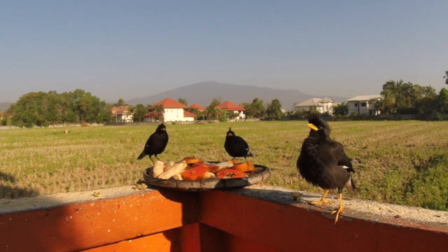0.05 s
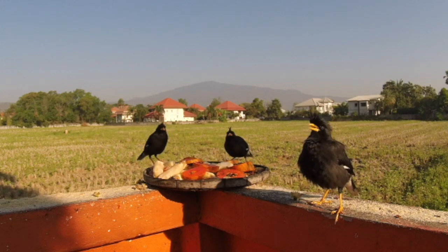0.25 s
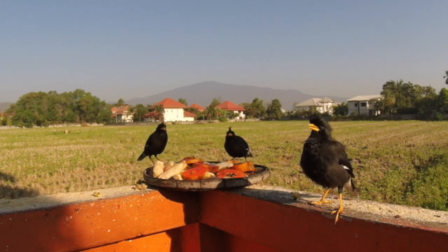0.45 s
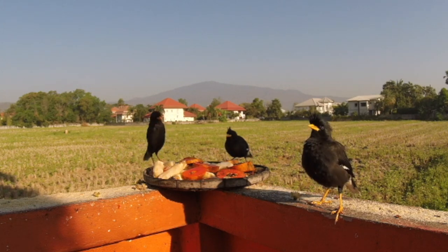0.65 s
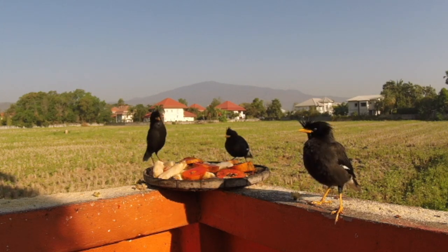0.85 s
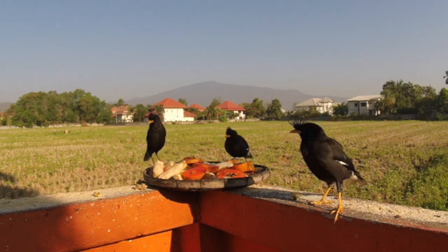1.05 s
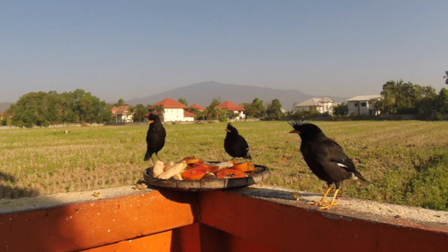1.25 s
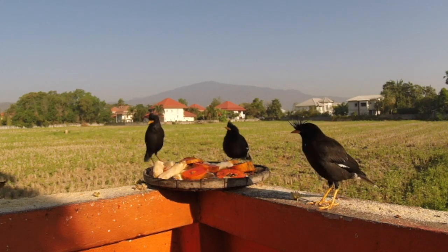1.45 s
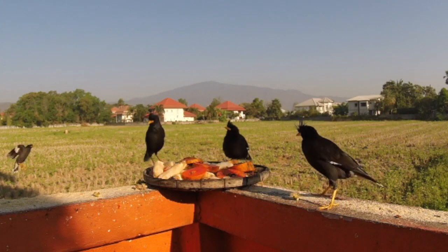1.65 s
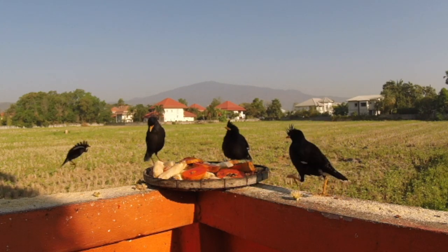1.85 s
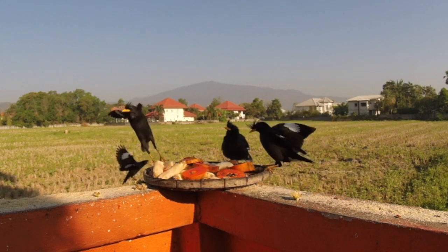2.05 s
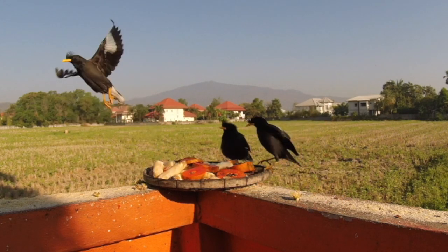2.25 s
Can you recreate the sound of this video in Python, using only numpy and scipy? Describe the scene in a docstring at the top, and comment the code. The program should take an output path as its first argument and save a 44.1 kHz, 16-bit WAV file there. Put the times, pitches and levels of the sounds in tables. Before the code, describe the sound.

A myna close to the microphone gives one loud call, a rising whistle that breaks into fast, harsh swoops. It dies away outdoors, leaving a couple of faint chirps over a soft distant rumble and a thin high whine.

```python
"""A myna gives one loud call: a rising whistle that breaks into seven fast, harsh swoops.
It sings pure up high and rasps down low, coloured by throat and beak peaks and a close reflection.
The balcony throws the call back and it dies away over open fields; other birds add a few faint chirps.
Underneath lie a distant rumble, a faint high buzz and a thin pulsing whine, probably a focus motor."""
import sys
import numpy as np
from scipy import signal
from scipy.fft import rfft, irfft, next_fast_len
from scipy.io import wavfile

SR = 44100
rng = np.random.default_rng(int(sys.argv[2]) if len(sys.argv) > 2 else 0)


def bounce(signal):
    """Save signal as a 16-bit WAV file at the path given by the first command-line argument."""
    frames = np.transpose(np.atleast_2d(signal))
    limited = np.clip(frames, -1, 1)
    pcm = np.round(limited * 32767).astype(np.int16)
    wavfile.write(sys.argv[1], SR, pcm)


N = 101429
T = np.arange(N) / SR

# the myna's opening whistle: t/s, f/Hz, relative level/dB
WHISTLE = [(.204, 2950, -39), (.209, 2874, -11), (.218, 3015, -11.5), (.233, 3015, -6.5),
           (.2375, 3195, -18), (.242, 3319, -3.5), (.254, 3510, -5.5)]
# its swoops: top t/s, top f/Hz, bottom t/s, bottom f/Hz, relative level/dB, rasp trim/dB, octave trim/dB
SWOOPS = [(.261, 4300, .286, 1704, 0.5, -17.5, 1.5), (.298, 4250, .324, 1547, 0.5, -14, -5),
          (.338, 4250, .364, 1550, -.5, -13, -2.5), (.380, 3940, .404, 1564, -.5, -13.5, 0),
          (.419, 3926, .444, 1644, -0.5, -8, -3), (.462, 3987, .487, 1551, 0, -8.5, 0.5),
          (.500, 3437, .524, 1621, -6, -6.5, -1)]


def undb(db):
    """Decibels to gain."""
    return 10 ** (np.asarray(db) / 20)


def unit(x):
    """Scale to rms 1."""
    return x / np.sqrt(np.mean(x ** 2))


def curve(rows):
    """Breakpoint envelope: times in the first column, values in the second."""
    rows = np.array(rows)
    return np.interp(T, rows[:, 0], rows[:, 1])


def wander(hz):
    """Smooth random modulation up to the given rate, rms 1."""
    lowpass = signal.butter(2, hz, fs=SR, output="sos")
    return unit(signal.sosfilt(lowpass, rng.standard_normal(2 * N))[N:])


def colour(x, points):
    """Minimum-phase EQ through (f/Hz, level/dB) points."""
    size = 2 * next_fast_len(N)
    hz, db = np.array(points).T
    f = np.maximum(np.arange(size // 2 + 1) * SR / size, 1)
    cepstrum = irfft(np.log(undb(np.interp(np.log(f), np.log(hz), db))))
    cepstrum[1:size // 2] *= 2
    cepstrum[size // 2 + 1:] = 0
    return irfft(rfft(x, size) * np.exp(rfft(cepstrum)))[:N]


def glide(start, end, midpoint=.48, steep=2.6):
    """S-shaped step from 0 to 1 between two times; the midpoint is a share of the span."""
    u = np.clip((T - start) / (end - start), 0, 1)
    a, b = (u / midpoint) ** steep, ((1 - u) / (1 - midpoint)) ** steep
    return a / (a + b)


def open_air(split_hz=3600, hiss_db=-50):
    """The bed: a distant rumble that swells a little, under a steady soft hiss."""
    # tone of the outdoor air: f/Hz, relative level/dB
    spectrum = [(15, -42), (30, -28), (60, -15), (100, -7), (170, -1), (270, -2), (450, -5.5), (700, -8.5),
                (1300, -12.5), (2900, -17), (4200, -20), (6500, -26), (9000, -31.5), (12000, -38),
                (16000, -41.5)]
    # swell of the rumble: t/s, level/dB
    swell = [(0, -51), (.15, -51.5), (.3, -45.5), (.5, -43), (.65, -45), (.85, -47), (1.15, -49.5),
             (1.7, -48.5), (2.3, -48)]
    noise = unit(colour(rng.standard_normal(N), spectrum))
    rumble = signal.sosfilt(signal.butter(1, split_hz, fs=SR, output="sos"), noise)
    return rumble * undb(curve(swell) + .5 * wander(3.3)) + (noise - rumble) * undb(hiss_db)


def high_buzz(band_hz=(13150, 14450), floor=.2):
    """A narrow, grainy band of very high noise comes and goes."""
    # bursts of buzz: middle t/s, length/s
    bursts = [(.28, .13), (.43, .04), (0.58, .04), (.785, .1), (.89, .03), (1.04, .04), (1.31, .13),
              (1.452, .03), (1.563, .03), (1.85, .13), (2.03, .03), (2.16, .04)]
    envelope = floor + sum(np.cos(np.pi * np.clip((T - s) / length, -.5, .5)) for s, length in bursts)
    noise = signal.sosfilt(signal.butter(3, band_hz, "band", fs=SR, output="sos"), rng.standard_normal(N))
    return undb(-68 + 2.5 * wander(60)) * envelope * unit(noise)


def motor_whine(pitch_hz=7483, sag_hz=128, octave_db=-6.5, backstroke_db=2.5):
    """A tiny motor steps forth and back at an even rate; its pitch sags late in the backstroke."""
    # loudness of the forward stroke: t/s, level/dB
    ride = [(0, -54), (.65, -52.5), (1.15, -54), (1.75, -48), (2.3, -51.5)]
    start_s, period_s, stroke_s, edge_s = .045, .06672, .018, .0031
    age = (T - start_s) % period_s
    forth, back = (np.sin(np.pi / 2 * np.clip(np.minimum(t, stroke_s - t) / edge_s, 0, 1))
                   for t in (age, age - stroke_s))
    sag = np.minimum(age / (2 * stroke_s), 1) ** 2.8 * (1 + .34 * wander(15))
    pitch = (pitch_hz - sag_hz * sag) * (1 + .004 * wander(300))
    phase = 2 * np.pi * np.cumsum(pitch) / SR
    envelope = (forth + undb(backstroke_db) * back) * undb(curve(ride) + 1.7 * wander(70))
    return envelope * (np.sin(phase) + undb(octave_db) * np.sin(2 * phase))


def reflections(x):
    """Each surface scatters the sound back as a delayed, fading cluster."""
    # balcony, house front and fields: delay/s, 60 dB decay time/s, level/dB
    surfaces = [(.004, .075, -14), (.06, .11, -29), (0.016, .9, -41.5)]
    response = np.zeros(N)
    for delay, t60, db in surfaces:
        tail = (T > delay) * np.exp(-np.log(1000) * T / t60)
        response += undb(db) * unit(rng.standard_normal(N) * tail)
    return signal.fftconvolve(x, response / np.sqrt(N))[:N]


def other_birds():
    """Faint chirps, each a short gliding sine with soft edges."""
    # chirps: middle t/s, length/s, f/Hz, glide/Hz, level/dB
    chirps = [(0.032, 0.011, 3210, -19, -48), (0.112, .022, 3200, -100, -56.5),
              (1.595, .0052, 3380, -150, -34.5), (1.975, 0.068, 3880, 300, -53.5)]
    out = np.zeros(N)
    for s, length, hz, glide_hz, db in chirps:
        u = np.clip((T - s) / length, -.5, .5)
        phase = 2 * np.pi * np.cumsum(hz + glide_hz * u) / SR
        out += undb(db) * np.cos(np.pi * u) ** 2 * np.sin(phase)
    return out


def myna_pitch(end_s, end_hz=1822):
    """The whistle climbs, then the pitch leaps and dives through each swoop and ends on a small lift."""
    pitch = curve(WHISTLE)
    last_s, last_hz, _ = WHISTLE[-1]
    for top_s, top_hz, low_s, low_hz, *_ in SWOOPS:
        pitch *= (top_hz / last_hz) ** glide(last_s, top_s)
        pitch *= (low_hz / top_hz) ** glide(top_s, low_s, midpoint=.42, steep=1.9)
        last_s, last_hz = low_s, low_hz
    return pitch * (end_hz / last_hz) ** glide(last_s, end_s)


def myna(end_s=.531, release_s=.003, harsh_below_hz=2770, flutter_hz=566):
    """The syrinx sings pure when high; when low it gains overtones and a half-pitch rasp."""
    # harmonics 3 to 5 of the syrinx: level/dB before the roll-off
    overtones = [-6, -4, -15]
    # rasp partials at 1.5, 2.5 ... 5.5 times the pitch: relative level/dB
    rasp_partials = [-1, 1, -4.5, -1.5, -10.5]
    # colour of the call: throat and beak peaks, with notches from a close reflection: f/Hz, level/dB
    call_colour = [(700, -47), (1250, -23), (1550, -8), (1750, -12), (2050, -15), (2200, -8.5), (2330, -27),
                   (2480, 1), (2750, -3), (3020, -3), (3140, -15), (3300, 1.5), (3500, -0.5), (3930, -7.5),
                   (4150, -31), (4400, -19), (4750, -12), (5150, -26), (5550, -12), (5900, -27), (6350, -9),
                   (7100, -37), (8100, -14), (8600, -29), (9300, -51.5), (11000, -61.5), (16000, -63.5)]
    pitch = myna_pitch(end_s)
    top_s, _, low_s, _, swoop_db, rasp_db, octave_db = np.array(SWOOPS).T
    swooping = np.interp(T, (top_s[0], top_s[0] + .008), (0, 1))
    rough = swooping * np.interp(T, (.29, .39), (.45, 1))
    harsh = swooping * np.clip((harsh_below_hz - pitch) / 800, 0, 1)
    bright = undb(np.interp(T, (.45, .53), (0, -6.5)))  # the top dulls as the call ends
    climb = np.maximum(np.gradient(pitch), 0) * swooping
    breaking = climb / climb.max()  # the tone shakes and dips on each fast upward leap

    jitter = .016 * (.12 + rough) + .03 * breaking
    phase = 2 * np.pi * np.cumsum(pitch * (1 + jitter * wander(flutter_hz))) / SR
    rolloff = undb(-9 * (1.5 - harsh) - 4 * (1 - swooping))  # per harmonic, steepest in the whistle
    octave = rolloff * undb(np.interp(T, low_s, octave_db)) * np.sin(2 * phase)
    upper = sum(undb(db) * rolloff ** (k - 1) * np.sin(k * phase) for k, db in enumerate(overtones, 3))
    tone = np.sin(phase) + octave + bright * upper

    rasp = np.zeros(N)
    for k, db in enumerate(rasp_partials, 1):
        partial = np.sin((k + .5) * phase + .6 * wander(flutter_hz))
        rasp += undb(db) * (bright if k > 2 else 1) * partial
    rasp *= harsh * undb(np.interp(T, low_s, rasp_db))
    hiss = rough * bright * undb(-15) * rng.standard_normal(N)

    accents = [(s, db) for s, _, db in WHISTLE] + list(zip(top_s + .012, swoop_db))
    effort_db = curve(accents) - 6 - 3 * breaking
    shimmer_db = 2.5 * rough * wander(flutter_hz)
    gate = (T > WHISTLE[0][0]) * np.clip((end_s - T) / release_s, 0, 1)
    return colour((tone + rasp + hiss) * gate * undb(effort_db + shimmer_db), call_colour)


def scene():
    """Mono mix: the birds and their reflections over the whine, the buzz and the open air."""
    birds = myna() + other_birds()
    return (birds + reflections(birds) + motor_whine() + high_buzz() + open_air())[None, :]


def record(dry, top_hz=15600):
    """The microphone cuts the very top."""
    return signal.sosfilt(signal.ellip(10, .1, 80, top_hz, fs=SR, output="sos"), dry)


dry = scene()
out = record(dry)
bounce(out)
```